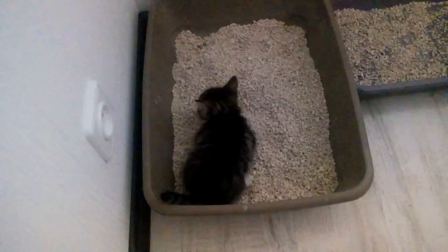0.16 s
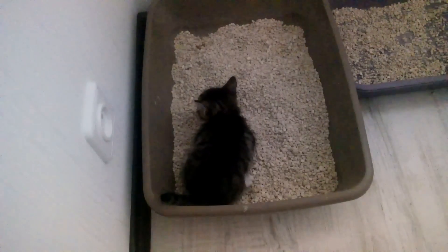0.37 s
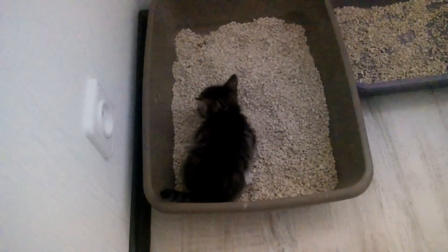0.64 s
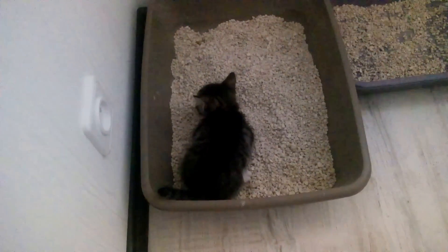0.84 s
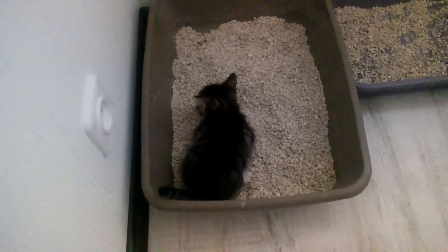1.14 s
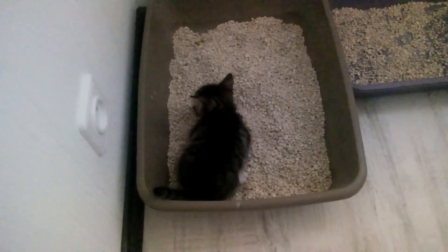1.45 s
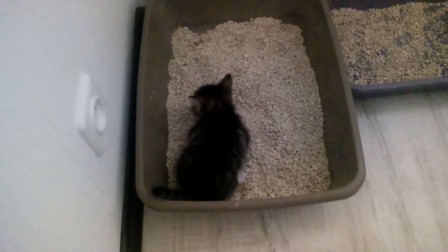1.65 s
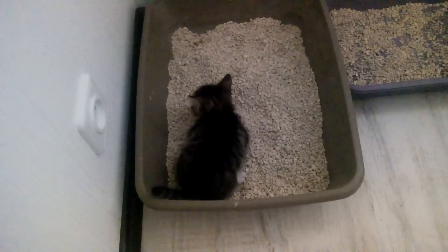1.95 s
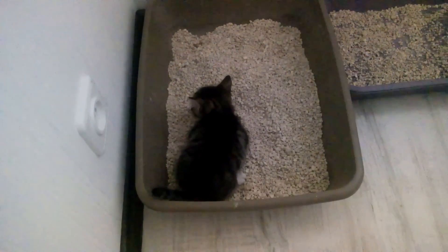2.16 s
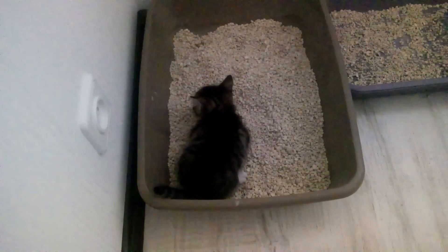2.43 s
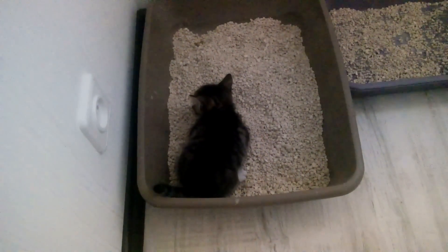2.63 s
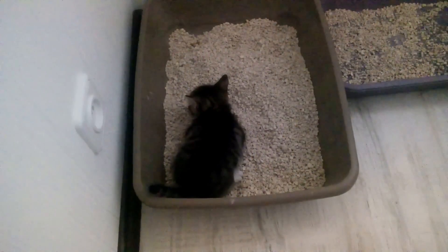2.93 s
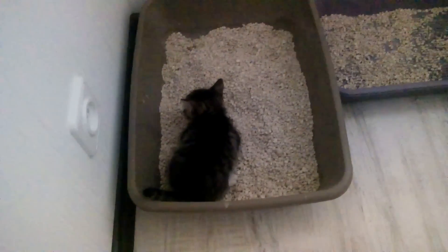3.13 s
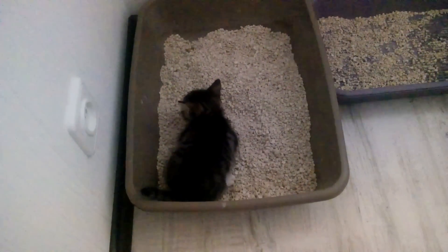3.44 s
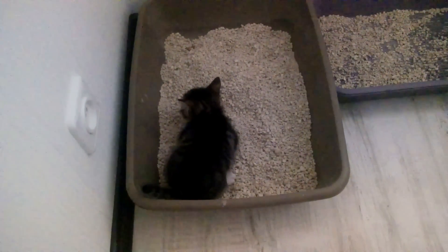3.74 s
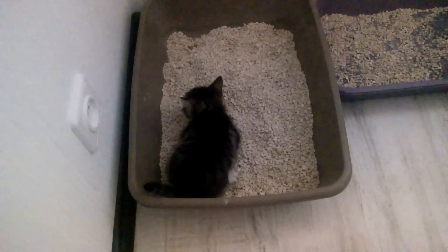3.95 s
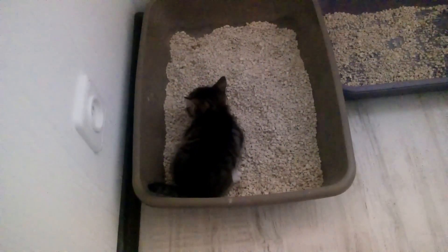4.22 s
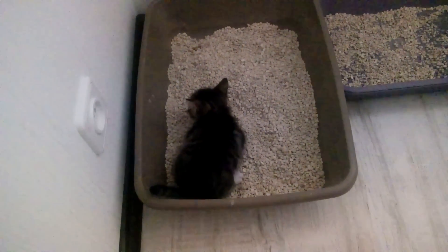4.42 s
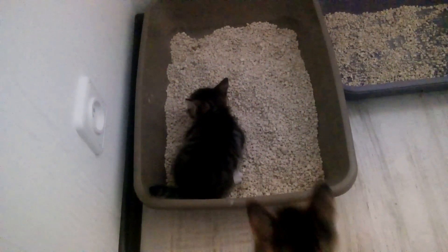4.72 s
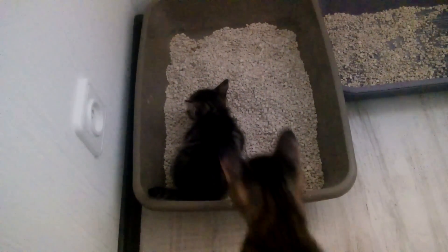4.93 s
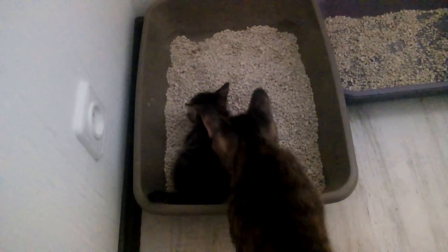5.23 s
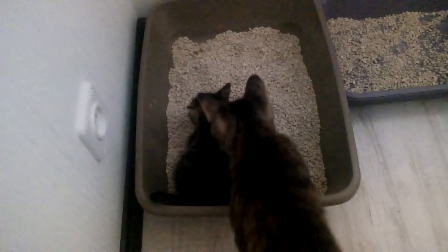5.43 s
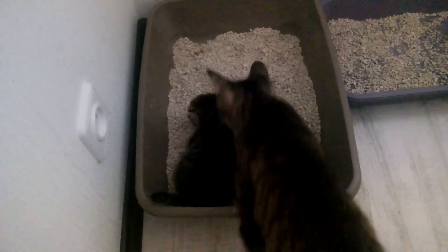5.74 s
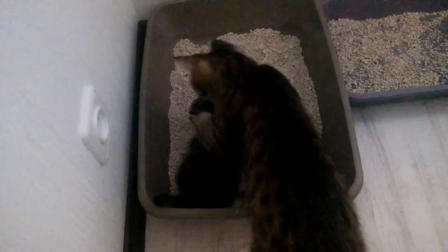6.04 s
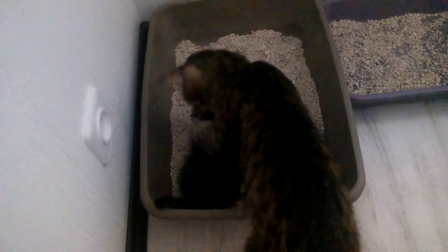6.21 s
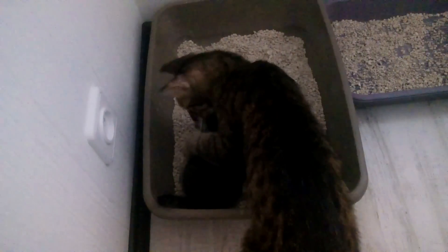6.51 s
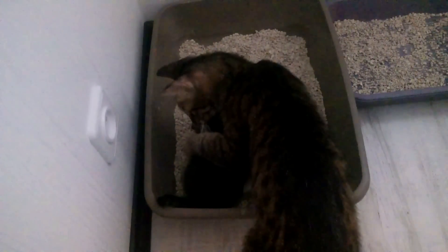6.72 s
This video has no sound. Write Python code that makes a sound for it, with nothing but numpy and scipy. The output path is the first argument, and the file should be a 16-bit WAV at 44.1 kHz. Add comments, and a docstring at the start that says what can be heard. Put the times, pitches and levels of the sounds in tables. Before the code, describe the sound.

A cat gives low rolling trills and a kitten mews twice, high and thin, over faint litter rustles in a small room.

```python
"""A kitten mews twice, high and thin, from a litter tray in a small hard-walled room.
A grown cat walks up and steps into the tray, answering with low trills that roll as her larynx flutters.
Both voices are harmonics of the vocal folds, shaped by throat and mouth, with an occasional rasp.
Granules rub and click under the paws. One microphone hears it all, more direct sound than wall echo,
over faint hiss, mains hum and a brief low rumble at the start."""
import sys
import numpy as np
from scipy import signal
from scipy.fft import rfft, irfft, next_fast_len
from scipy.io import wavfile
from scipy.ndimage import map_coordinates

SR = 44100
rng = np.random.default_rng(int(sys.argv[2]) if len(sys.argv) > 2 else 0)


def inscribe(sig):
    """Save sig as 16-bit PCM at rate SR to the path in sys.argv[1].

    A 1-D sig is mono; a 2-D sig holds one channel per row.
    Samples are clipped to [-1, 1] before scaling.
    """
    pcm = np.round(np.clip(np.atleast_2d(sig).T, -1, 1) * 32767)
    wavfile.write(sys.argv[1], SR, pcm.astype(np.int16))


N = 302967
TIME = np.arange(N) / SR

# Room tone with microphone hiss, and the dull rumble. Each row: frequency in Hz, relative level in dB.
HISS_SPECTRUM = [(15, -49), (25, -30), (53, -16), (69, -23), (86, 0.5), (129, -0.5), (260, -3.5),
                 (359, -1.5), (457, -4), (614, -4), (1240, -8), (2060, -9.5), (2420, -11.5), (3260, -9.5),
                 (15500, -16)]
RUMBLE_SPECTRUM = [(80, -20), (130, 3), (160, -1), (230, -44)]
# Mains hum. Each row: frequency in Hz, level in dB.
MAINS_PARTIALS = [(48.4, -84.5), (96.9, -93)]

# Paws shifting in the tray. Each row: start in seconds, length in seconds, level in dB.
PAW_SHUFFLES = [(-.02, 0.06, -68), (0.079, 0.092, -63), (0.384, 0.43, -77), (1.023, 0.05, -63.5),
                (1.767, 0.1, -66), (2.601, 0.16, -62), (4.102, 0.045, -68), (4.772, 0.12, -69.5),
                (6.05, 0.051, -58), (6.62, 0.11, -72), (6.798, 0.033, -67.5)]
# Single granules clicking. Each row: start in seconds, relative level in dB.
GRANULE_CLICKS = [(2.76, -44.5), (3.472, -51), (6.2695, -48)]
# The colour of the granules. Each row: frequency in Hz, relative level in dB.
LITTER_SPECTRUM = [(500, -16), (1400, -9.5), (2250, -14.5), (2700, 1), (3100, -10), (3900, -0.5),
                   (4600, 3.5), (5100, -3), (6200, -26), (14000, -20)]

# The cat's calls, each from start to end. Each row: time in seconds, pitch in Hz.
CALL_TUNE = [(2.075, 619.7), (2.12, 579.4), (2.2, 515.3), (2.38, 501), (2.48, 532), (2.54, 506),
             (2.605, 499.5), (2.638, 607)]
RISE_TUNE = [(3.195, 647.5), (3.23, 538.4), (3.268, 491), (3.326, 573.3), (3.43, 565.4)]
SQUEAK_TUNE = [(3.39, 603), (3.45, 668), (3.59, 779), (3.676, 705)]
LEAD_IN_TUNE = [(4.258, 741), (4.301, 825), (4.331, 792)]
GREETING_TUNE = [(4.285, 812.3), (4.333, 684), (4.449, 604.0), (4.549, 632), (4.659, 575), (4.905, 624.3),
                 (5.077, 574.7), (5.103, 604), (5.135, 580)]
MURMUR_TUNE = [(5.661, 526), (5.76, 618), (5.87, 580)]
CHIRP_TUNE = [(6.636, 507.3), (6.735, 523)]
# Her voice in those calls, in order. Each row: fundamental, second harmonic and overtones in dB,
# swell of the lowest two and of the overtones in dB/s, release in seconds, roll depth from 0 to 1,
# roll length in seconds, roll rate in Hz, throb in dB, relative level of the husk in dB.
TRILL_VOICES = [(-58, -59, -58, 9.5, -6.5, 0.034, 0.96, 0.41, 29, -1.5, -8),
                (-55.5, -57, -57.5, -1, -46, 0.041, 0.75, 0.13, 41, 1, -7),
                (-57.5, -70, -67, -27, 41, 0.046, 0.17, 0.072, 41.6, 1, -10),
                (-54, -85, -56, 26, -5, 0.0077, 0.13, .1, 29.3, 17, -4),
                (-55.5, -50.5, -52, -2.5, -5.5, 0.046, 0.62, 2, 31, 0.5, -12),
                (-65, -72, -90, -13, 35, 0.015, 0.83, 0.26, 42, -1, -30),
                (-53.5, -65.5, -71, -70, -110, 0.028, 0.06, .1, 31, -6, 12)]
# Her mouth opening for the greeting. Each row: time in seconds, opening from 0 to 1.
CAT_MOUTH = [(4.37, 0.19), (4.48, 0.53), (5.15, 0.77), (5.5, 0.1)]
# Jaw drops that make the greeting flare. Each row: start, end, opening time and closing time in seconds,
# then the boost to overtones, second harmonic and treble in dB.
JAW_DROPS = [(4.479, 4.676, 0.053, 0.099, 20, 9.5, -0.5), (4.891, 5.002, 0.02, 0.06, 20.5, -1, -12)]
# Her throat with lips closed and open, her rasp, her husk. Each row: frequency in Hz, relative dB.
CAT_CLOSED_THROAT = [(500, -14), (830, 17.5), (1400, 8.5), (1750, -17), (2150, 5.5), (2450, -17), (2900, 2),
                     (3150, -30), (3850, 7), (4500, -6), (5800, -37)]
CAT_OPEN_THROAT = [(1500, 28), (1900, 21), (2500, 0.5), (3100, -17.5), (3800, -57), (4600, -45),
                   (5600, -11), (6600, -59)]
CAT_RASP_SPECTRUM = [(500, -52), (1200, -7), (1800, -1.5), (2350, 12.5), (3100, -20), (4500, -40),
                     (5600, -11.5), (6800, -41)]
CAT_HUSK_SPECTRUM = [(900, -24), (2700, -2), (3850, 2), (4800, -25), (7000, -46)]

# The kitten's two mews, each from start to end. Each row: time in seconds, pitch in Hz.
MEW_TUNE = [(3.483, 1450), (3.491, 1382), (3.559, 1414), (3.587, 1481), (3.733, 1543), (3.829, 1450),
            (3.945, 1444), (3.985, 1377), (4.063, 1438), (4.079, 1464), (4.098, 1140)]
CRY_TUNE = [(5.449, 1470), (5.459, 1441), (5.515, 1627), (5.581, 1733), (5.653, 1670), (5.903, 1584),
            (6.021, 1488), (6.055, 1269), (6.077, 1198)]
# Its voice in those mews. Each row: start of opening, opening time and start of the fade in seconds,
# fundamental, second harmonic and overtones in dB, overtone fade in dB/s, treble in dB, quaver time and
# half length in seconds, quaver depth as a share of pitch, relative air in dB, fraying in radians.
MEW_VOICES = [(3.531, 0.039, 3.503, -46.5, -39, -40, 41, 0, 3.5, 0.04, 0.069, -14, 0.012),
              (5.445, 0.067, 5.535, -48.5, -35, -43, 26, -2.5, 5.525, 0.035, 0.021, -18, 0.0095)]
# The kitten's throat and its rasp. Each row: frequency in Hz, relative level in dB.
KITTEN_THROAT = [(3700, -4), (4500, 5.5), (5200, 15), (6000, -4), (6800, -10.5), (7600, -26), (8800, -31.5),
                 (10200, -14), (11200, -17.5), (12100, -14), (13300, -36)]
KITTEN_RASP_SPECTRUM = [(500, -20), (1200, -11.5), (1800, 3), (2500, 3.5), (3600, -8.5), (4800, 5.5),
                        (5600, -4), (7000, -49), (9000, -37), (10500, -23), (12300, -23), (15000, -29)]

# Where each voice's treble begins. Each row: frequency in Hz, share of the treble boost from 0 to 1.
CAT_TREBLE = [(3500, 0), (5000, 1)]
KITTEN_TREBLE = [(6500, 0.24), (9000, 0.76)]
# Husky catches behind the cat's closed lips, and moments when either voice breaks into a rasp.
# Each row: centre in seconds, half length in seconds, relative level in dB.
CAT_HUSKS = [(2.22, 0.069, -61), (4.305, 0.007, -57)]
CAT_RASPS = [(4.572, 0.012, -35.5), (4.627, 0.0099, -39), (5.103, 0.0063, -57)]
KITTEN_RASPS = [(3.61, 0.02, -58.5), (5.617, 0.011, -44), (5.725, 0.021, -45), (5.772, 0.011, -49),
                (5.824, 0.013, -42.5), (5.917, 0.0067, -48.5), (6.06, 0.018, -65.5)]
# The ring of the hard walls. Each row: frequency in Hz, seconds to die away by 60 dB.
WALL_DECAY = [(300, 0.49), (1500, 0.27), (5000, 0.5), (12000, 0.028)]

TRILL_SOFT_DB = (11, 9, 27)  # how far fundamental, second harmonic and overtones sink at no effort
MEW_SHUT_DB = (-1, 26.5, 29.5)  # how far the same three sink behind a shut mouth
MEW_FADE_DB_PER_S = (2.5, 40)  # fundamental and second harmonic as the mew gradually dulls
ROLL_SWING, ROLL_JITTER, CALM_JITTER = 0.051, 0.026, 0.0057  # shares of the cat's pitch
MEW_WAVER, MEW_JITTER = 0.0048, 0.0034  # shares of the kitten's pitch


def amp(db):
    """Decibels to gain."""
    return 10 ** (np.asarray(db) / 20)


def unit(x):
    """Scale to rms 1."""
    return x / np.sqrt(np.mean(x ** 2) + 1e-20)


def ramp(x):
    """Hold between 0 and 1."""
    return np.clip(x, 0, 1)


def along(points, hz):
    """(Hz, value) points read on a log axis."""
    f, v = np.transpose(points)
    return np.interp(np.log(hz + 1), np.log(f + 1), v)


def curve(points, t):
    """(seconds, value) points read at the times t."""
    return np.interp(t, *np.transpose(points))


def span(tune):
    """The sample times of one call."""
    return TIME[(TIME > tune[0][0]) & (TIME < tune[-1][0])]


def wobble(t, rate):
    """A smooth random curve, rate knots a second."""
    return map_coordinates(rng.standard_normal(4096), [(t - t[0]) * rate], mode="wrap")


def filtered(x, response):
    """x through a gain that depends on frequency."""
    size = next_fast_len(N + SR // 2)
    return irfft(rfft(x, size) * response(np.fft.rfftfreq(size, 1 / SR)), size)[:N]


def coloured(x, spectrum):
    """x given a spectrum, at rms 1."""
    return unit(filtered(x, lambda hz: amp(along(spectrum, hz))))


def noise(spectrum):
    """Steady coloured noise at rms 1."""
    return coloured(rng.standard_normal(N), spectrum)


def room_tone(hiss_db=-67.5, rumble_db=-76, rumble_s=0.89):
    """Mains hum, steady room noise and microphone hiss, and a low rumble that is soon gone."""
    hum = sum(amp(db) * np.sqrt(2) * np.sin(2 * np.pi * (hz * TIME + rng.random()))
              for hz, db in MAINS_PARTIALS)
    hiss = amp(hiss_db) * noise(HISS_SPECTRUM)
    rumble = amp(rumble_db) * np.exp(-(TIME / rumble_s) ** 2) * noise(RUMBLE_SPECTRUM)
    return hum + hiss + rumble


def litter(grains_per_s=1200, click_t60=0.024, click_db=-7):
    """Each shift of a paw rubs many granules together; now and then one clicks alone."""
    grains = (rng.random(N) < grains_per_s / SR) * rng.standard_normal(N)
    push = sum(amp(db) * np.exp(-(2 * (TIME - start) / length - 1) ** 4)
               for start, length, db in PAW_SHUFFLES)
    clicks = sum(amp(db + click_db - 60 * np.abs(TIME - start) / click_t60) * (TIME >= start)
                 for start, db in GRANULE_CLICKS)
    return push * coloured(grains, LITTER_SPECTRUM) + clicks * noise(LITTER_SPECTRUM)


def voice_harmonics(t, pitch, levels_db, throat, count, room_waver_db, fraying, edge_s=0.004):
    """Harmonics of the voice, each wavering in level as wall echoes interfere."""
    first_db, second_db, over_db = levels_db
    k = np.arange(1, count + 1)[:, None]
    resonance = amp(throat(k[2:] * pitch))  # from the third up the throat shares out the level
    overtones = amp(over_db) * resonance / np.linalg.norm(resonance, axis=0)
    gains = np.vstack([amp(first_db), amp(second_db), overtones])
    gains *= [unit(amp(room_waver_db * wobble(t, 75.28))) for _ in k]
    phase = 2 * np.pi * (k * np.cumsum(pitch) / SR + rng.random((count, 1)))
    phase += fraying * k ** 2 * [wobble(t, 900) for _ in k]  # the highest harmonics fray into hiss
    gate = ramp(np.minimum(t - t[0], t[-1] - t) / edge_s)
    return np.sqrt(2) * gate * np.sum(gains * np.sin(phase), axis=0)


def turbulence(t, vibration, spectrum):
    """Air rushes through the folds as strongly as they vibrate."""
    return np.abs(np.interp(TIME, t, vibration, 0, 0)) * noise(spectrum)


def trill(tune, first_db, second_db, over_db, swell_db_per_s, over_swell_db_per_s, release_s,
          roll_depth, roll_s, roll_hz, throb_db, husk_db, attack_s=0.046, jaw_calming=0.67):
    """The larynx flutters, then settles: pitch and loudness throb; effort brings in the overtones."""
    t = span(tune)
    age = t - t[0]
    effort = ramp(np.minimum(age / attack_s, (t[-1] - t) / release_s))
    jaw, flare_over_db, flare_second_db, treble_db = jaw_drops(t)
    held_db = [first_db + swell_db_per_s * age,
               second_db + swell_db_per_s * age + flare_second_db,
               over_db + over_swell_db_per_s * age + flare_over_db]
    levels_db = held_db - np.outer(TRILL_SOFT_DB, 1 - effort)
    depth = roll_depth * effort * (1 - jaw_calming * jaw) / (1 + (age / roll_s) ** 10)
    roll_phase = np.pi * np.cumsum(roll_hz * (1 + 0.1224 * wobble(t, 16))) / SR
    roll = depth * unit(np.abs(np.sin(roll_phase)) - 2 / np.pi)  # round crests, sharp dips
    jitter = (CALM_JITTER + ROLL_JITTER * depth ** 2) * wobble(t, 300)
    pitch = curve(tune, t) * (1 + ROLL_SWING * roll + jitter)
    mouth = curve(CAT_MOUTH, t)

    def throat(hz):
        shape_db = (1 - mouth) * along(CAT_CLOSED_THROAT, hz) + mouth * along(CAT_OPEN_THROAT, hz)
        return shape_db + treble_db * along(CAT_TREBLE, hz)

    voice = voice_harmonics(t, pitch, levels_db, throat, count=12, room_waver_db=2.5, fraying=0.011)
    voice *= amp(throb_db * roll)
    hoarse = voice * depth * (1 - mouth)  # deep rolls behind closed lips are husky
    return np.interp(TIME, t, voice, 0, 0) + amp(husk_db) * turbulence(t, hoarse, CAT_CLOSED_THROAT)


def rasps(moments, spectrum, gain_db):
    """For an instant the folds vibrate chaotically and fill the gaps between the harmonics."""
    swell = sum(amp(db) * np.exp(-0.5 * ((TIME - centre) / width) ** 2) for centre, width, db in moments)
    return amp(gain_db) * swell * noise(spectrum)


def cat():
    """Three trills, the second ending in a squeak, the third led in by a hum; then two soft ones."""
    tunes = [CALL_TUNE, RISE_TUNE, SQUEAK_TUNE, LEAD_IN_TUNE, GREETING_TUNE, MURMUR_TUNE, CHIRP_TUNE]
    trills = sum(trill(tune, *row) for tune, row in zip(tunes, TRILL_VOICES))
    breaks = rasps(CAT_RASPS, CAT_RASP_SPECTRUM, gain_db=-0.5)
    husks = rasps(CAT_HUSKS, CAT_HUSK_SPECTRUM, gain_db=1)
    return trills + breaks + husks


def mew(tune, opens_s, opening_s, fades_s, first_db, second_db, over_db, over_fade_db_per_s, treble_db,
        quaver_at_s, quaver_s, quaver_depth, air_db, fraying, release_s=0.033, sheen_db_per_s=28):
    """A thin whistle that quavers once, brightens as the mouth snaps open and gradually dulls."""
    t = span(tune)
    mouth = ramp(np.minimum((t - opens_s) / opening_s, (t[-1] - t) / release_s))
    fading_s = np.maximum(t - fades_s, 0)
    muffle_db = np.outer(MEW_SHUT_DB, 1 - mouth)
    fade_db = np.outer([*MEW_FADE_DB_PER_S, over_fade_db_per_s], fading_s)
    levels_db = np.c_[[first_db, second_db, over_db]] - muffle_db - fade_db
    quaver = quaver_depth * np.exp(-((t - quaver_at_s) / quaver_s) ** 2)
    drift = MEW_WAVER * wobble(t, 70)
    pitch = curve(tune, t) * (1 + drift + (MEW_JITTER + quaver) * wobble(t, 600))
    sheen_db = treble_db + sheen_db_per_s * fading_s  # the thin treble outlasts the other overtones

    def throat(hz):
        return along(KITTEN_THROAT, hz) + sheen_db * along(KITTEN_TREBLE, hz)

    voice = voice_harmonics(t, pitch, levels_db, throat, count=8, room_waver_db=4, fraying=fraying)
    air = turbulence(t, amp(levels_db[2]), KITTEN_RASP_SPECTRUM)  # comes and goes with the overtones
    return np.interp(TIME, t, voice, 0, 0) + amp(air_db) * air


def kitten():
    """From the tray, a mew and then a louder, hoarser cry."""
    mews = sum(mew(tune, *row) for tune, row in zip([MEW_TUNE, CRY_TUNE], MEW_VOICES))
    return mews + rasps(KITTEN_RASPS, KITTEN_RASP_SPECTRUM, gain_db=0.5)


def jaw_drops(t):
    """How far the cat's jaw has dropped, and the dB this adds to overtones, second harmonic and treble."""
    drops = np.array([ramp(np.minimum((t - start) / opening, (end - t) / closing))
                      for start, end, opening, closing, *_ in JAW_DROPS])
    boosts_db = np.array(JAW_DROPS)[:, -3:].T @ drops
    return drops.sum(axis=0), *boosts_db


def walls(x, wet_db, gap_s=0.00093):
    """The close walls answer quickly; the highest treble dies first."""
    hz, t, spectra = signal.stft(rng.standard_normal(SR // 2), SR, nperseg=256)
    decay = amp(-60 * t / along(WALL_DECAY, hz)[:, None])
    _, tail = signal.istft(spectra * decay, SR, nperseg=256)
    tail *= np.arange(len(tail)) > gap_s * SR
    echo = signal.fftconvolve(x, tail / np.linalg.norm(tail))[:N]
    return (x + amp(wet_db) * echo) / np.hypot(1, amp(wet_db))


def scene():
    """Both animals and the tray in one small room, on one microphone."""
    sources = cat() + kitten() + litter()
    return (walls(sources, wet_db=-7) + room_tone())[None]


def record(dry, top_hz=15720):
    """The recorder keeps nothing above its band limit."""
    return np.array([filtered(channel, lambda hz: hz < top_hz) for channel in dry])


dry = scene()
out = record(dry)
inscribe(out)
```